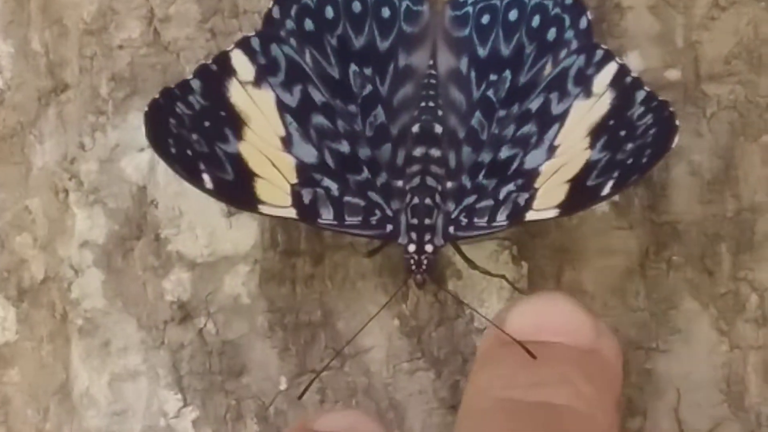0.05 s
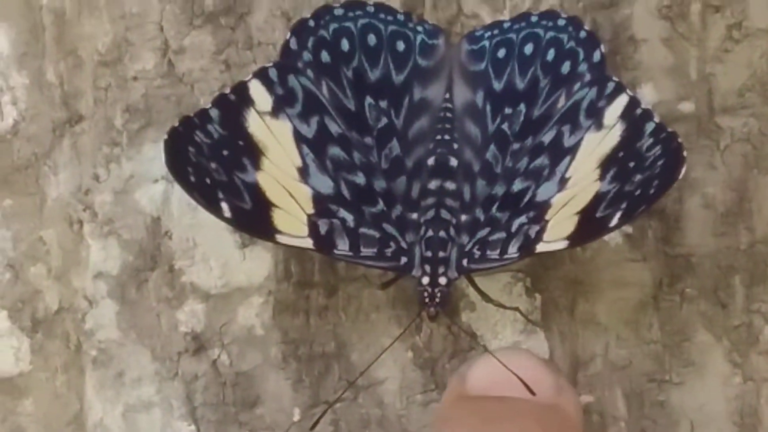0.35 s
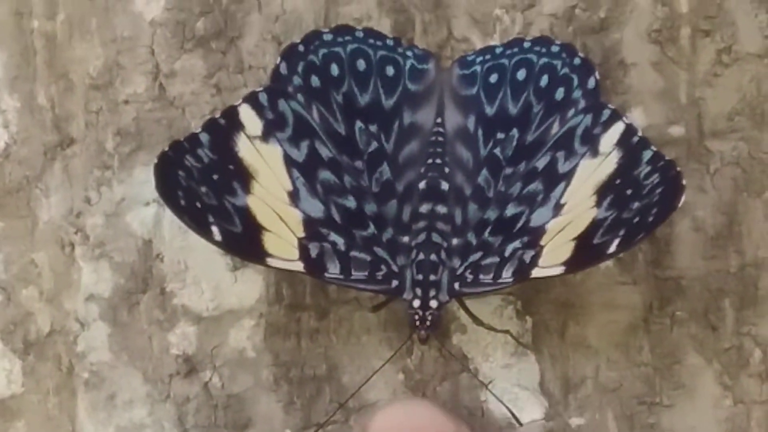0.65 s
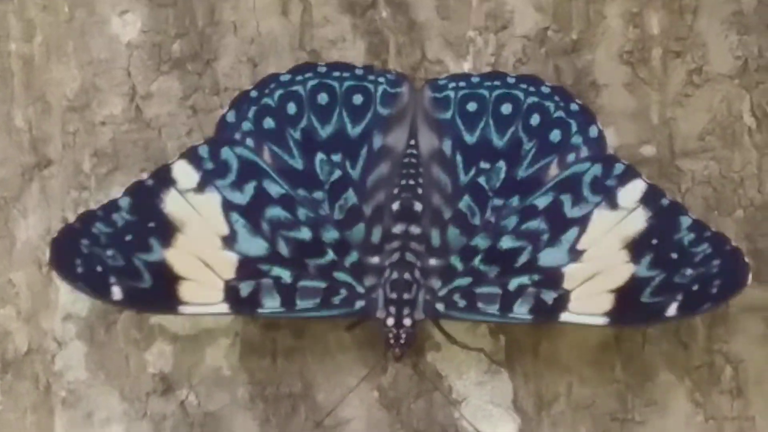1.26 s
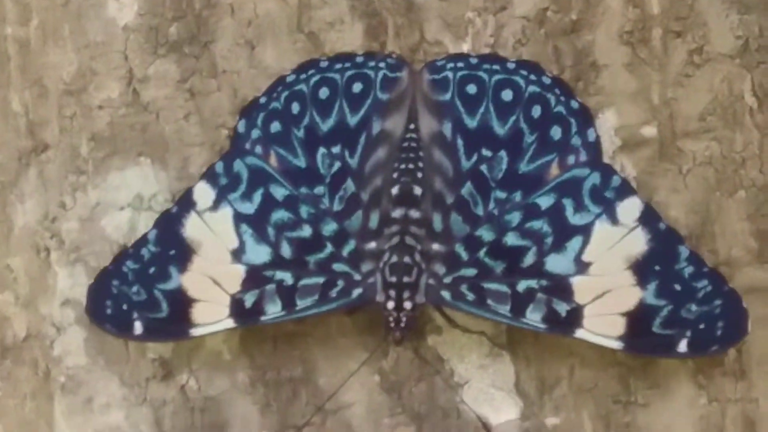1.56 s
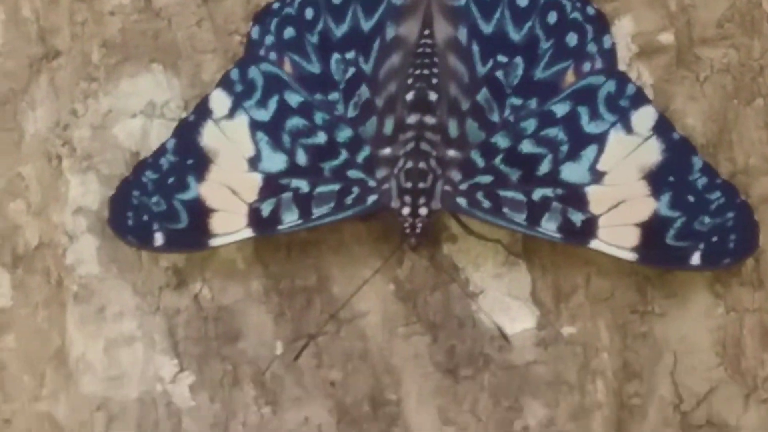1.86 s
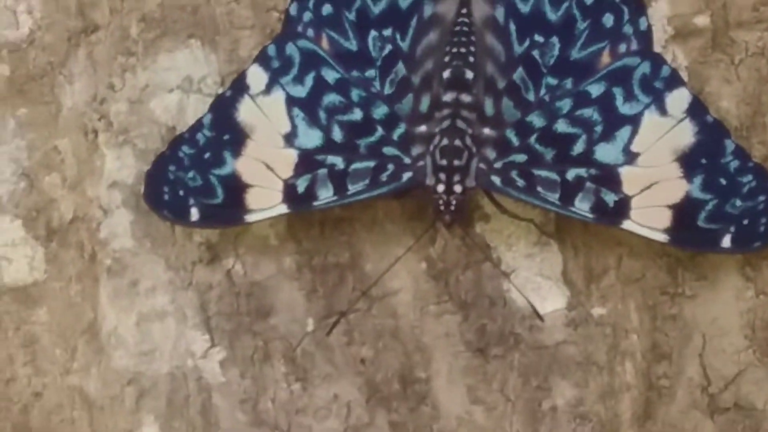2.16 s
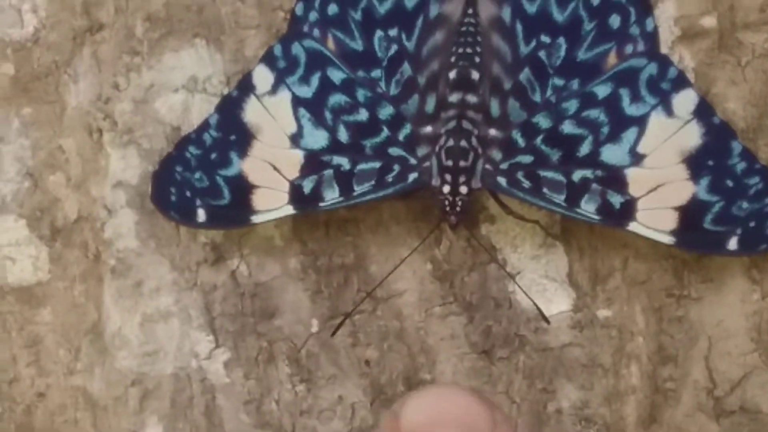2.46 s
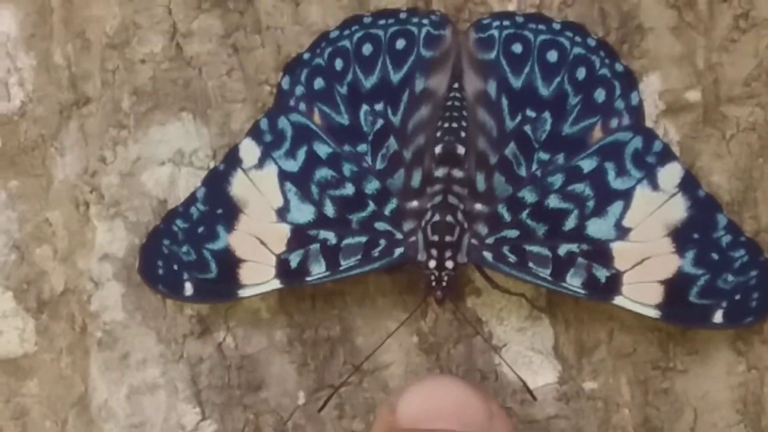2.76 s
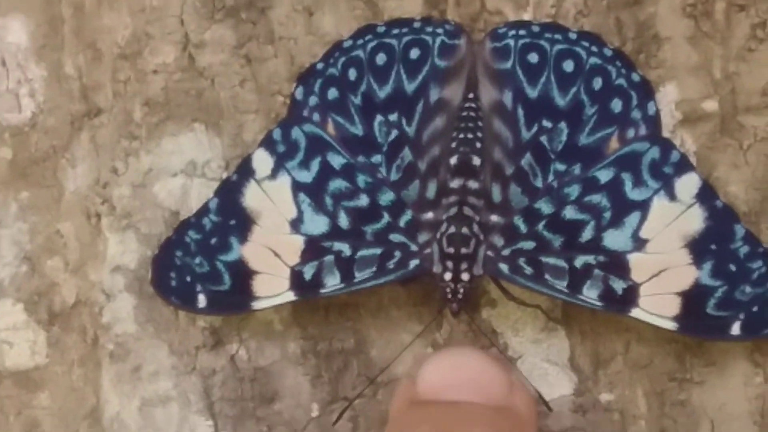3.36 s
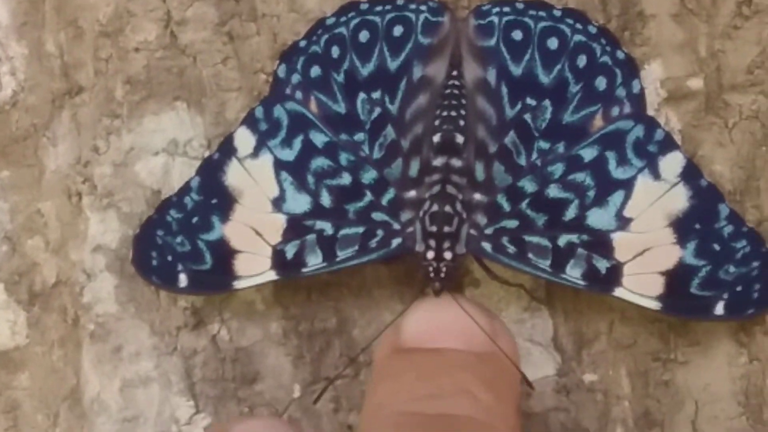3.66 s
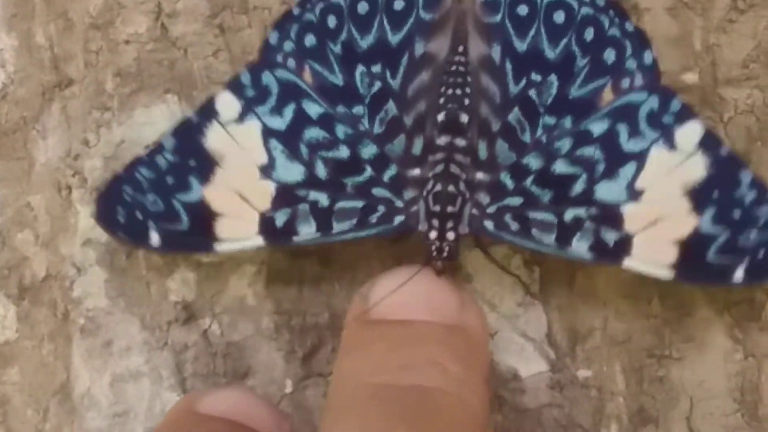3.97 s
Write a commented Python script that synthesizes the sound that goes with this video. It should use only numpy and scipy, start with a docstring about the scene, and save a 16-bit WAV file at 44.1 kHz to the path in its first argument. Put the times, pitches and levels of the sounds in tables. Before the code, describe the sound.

Something dry rubs close to the microphone outdoors, crackling with sharp little snaps, dense at first, then in sparser bursts. A distant engine sinks to idle and speeds up again, and one thin, high chirp sounds midway.

```python
"""Outdoors, something dry rubs close by: thousands of tiny slips make a crackle, bigger catches
let go with sharp snaps, and now and then a scrape rings briefly. Far off, an engine puffs through
a booming exhaust: it sinks to idle, picks up speed and eases off once.
One thin, high chirp sounds over the faint hiss of the air."""
import sys
import numpy as np
from scipy import signal
from scipy.fft import rfft, irfft
from scipy.io import wavfile
from scipy.ndimage import map_coordinates

SR = 44100
rng = np.random.default_rng(int(sys.argv[2]) if len(sys.argv) > 2 else 0)


def to_wav(s):
    """Save 16-bit WAV."""
    ch = np.atleast_2d(s).T  # columns
    pcm = np.round(np.clip(ch, -1, 1) * 32767)  # PCM
    wavfile.write(sys.argv[1], SR, pcm.astype(np.int16))


N = 176400
T, HZ = np.arange(N) / SR, np.fft.rfftfreq(N, 1 / SR)


def amp(db):
    """Turns decibels into a number to multiply by."""
    return 10 ** (np.asarray(db) / 20)


def evened(x):
    """Scales a sound to an average power of 1."""
    return x / np.sqrt(np.mean(x ** 2) + 1e-20)


def add(mix, start_s, sound):
    """Mixes a sound in at the given time."""
    part = mix[max(round(start_s * SR), 0):][:len(sound)]
    part += sound[:len(part)]


def colour(x, tone):
    """Filters a sound by a tone table; any ringing comes after a hit, never before."""
    f, db = np.transpose(tone)
    log_gain = np.log(amp(np.interp(np.log(HZ + 1), np.log(f), db)))
    log_response = np.conj(signal.hilbert(np.r_[log_gain, log_gain[-2:0:-1]]))
    return irfft(rfft(x) * np.exp(log_response[:len(HZ)]), N)


def bands(x, low_hz=1514, high_hz=6060):
    """Splits a sound into low body, middle rasp and high treble."""
    low = 1 / (1 + (HZ / low_hz) ** 14)
    high = 1 - 1 / (1 + (HZ / high_hz) ** 8)
    return [irfft(rfft(x) * share, N) for share in (low, 1 - low - high, high)]


def patchy(x):
    """As the contact shifts, random patches of pitch get briefly louder or softer."""
    hz, t, spectrum = signal.stft(x, SR, nperseg=1024, noverlap=768)
    for db, width_hz, length_s in ((3.5, 129.7, .03), (1.04, 967, .02)):  # narrow, then broad
        field = rng.uniform(-1, 1, (400, 400)) * np.sqrt(3)
        grid = np.meshgrid(hz / width_hz, t / length_s, indexing="ij")
        spectrum = spectrum * amp(db * map_coordinates(field, grid, order=1, mode="wrap"))
    return signal.istft(spectrum, SR, nperseg=1024, noverlap=768)[1][:N]


# Tone of the rubbing: f/Hz, level/dB
RUB_TONE = [(60,-36),(180,-13),(320,-15.5),(450,-11.5),(700,-13),(1050,-10),(1350,-12),(1800,-7),(2400,-8),(3100,-3),(3900,0),(4600,-0.5),(6400,-7.5),(8100,-8),(9000,-14.5),(11200,-10.5),(13800,-12.5),(15800,-14)]
# How loud the rubbing is, before trim_db is added: t/s, body/dB, rasp/dB, treble/dB
RUB_LEVELS = [(0.0, -66, -47.5, -58), (0.06, -57, -51.5, -58), (0.12, -66, -56.5, -59.5),
              (0.2, -73, -55.5, -59.5), (0.26, -69.5, -49.0, -51.5), (0.32, -67.5, -50.5, -57),
              (0.38, -53.5, -43.5, -54.5), (0.47, -62, -48.0, -49), (0.55, -61.5, -46.5, -55),
              (0.62, -67, -55, -58), (0.69, -69, -50, -57.0), (0.73, -64.5, -44.5, -50.0),
              (0.82, -67.5, -50.5, -53), (0.97, -71.5, -51.0, -55.5), (1.04, -68.5, -54, -56.5),
              (1.1, -68.5, -49.5, -53), (1.17, -68, -49.5, -53), (1.23, -57, -47.5, -50.5),
              (1.309, -63, -45.5, -52), (1.38, -58.5, -39.5, -46.5), (1.45, -61.5, -46.5, -52),
              (1.52, -64.0, -45.5, -50.0), (1.62, -56, -47, -52), (1.72, -67.5, -55.0, -57),
              (1.8, -76, -57.5, -63), (1.9, -83, -63.5, -67.5), (1.968, -66, -49.5, -57),
              (2.06, -75, -64, -67.5), (2.16, -82.0, -64.0, -69), (2.3, -79.0, -59.0, -59.5),
              (2.39, -75, -61.5, -63), (2.51, -79, -64.0, -65.5), (2.578, -68, -49.5, -52.5),
              (2.7, -74, -55, -58), (2.77, -77.0, -56.5, -62.5), (2.85, -85, -59.5, -58.5),
              (2.93, -84, -67.0, -74), (3.02, -90, -67, -66.0), (3.063, -64.5, -41.5, -46.5),
              (3.13, -67.0, -50.5, -52), (3.19, -93, -64.5, -68.5), (3.32, -103, -63.5, -61),
              (3.44, -63.5, -48.0, -48.5), (3.5, -81.5, -62.5, -59), (3.59, -71, -49.5, -51.5),
              (3.7, -87, -64.5, -59), (3.83, -80.5, -61, -58.5), (3.97, -67.5, -48.5, -56.0),
              (4.0, -94, -55.5, -59)]

def rubbing(slips_per_s=5500, spread_db=3, crack_s=.0015, tail_s=.16, tail_db=1, smooth=.48):
    """Each tiny slip makes a brief crackle with a tail; pressure sets how loud the three bands are."""
    sizes = amp(spread_db * np.minimum(rng.exponential(1, N), 6))
    slips = sizes * (rng.random(N) < slips_per_s / SR)
    t = T[:SR // 5]
    crack = evened(np.exp(-t / crack_s))
    tail = amp(tail_db) * evened(np.exp(-np.log(1000) * t / tail_s))  # 60 dB down after tail_s
    power = abs(signal.fftconvolve(slips ** 2, crack ** 2 + tail ** 2)[:N])
    loudness = np.hypot(evened(np.sqrt(power)), smooth)  # smooth hiss fills the gaps
    crackle = colour(loudness * patchy(rng.standard_normal(N)), RUB_TONE)
    times, *levels = np.transpose(RUB_LEVELS)
    trim_db = (-1, -1.5, 2.5)
    parts = zip(bands(crackle), levels, trim_db)
    return sum(evened(band) * amp(np.interp(T, times, level) + db) for band, level, db in parts)


def echo(x, level_db, fade_s):
    """Adds a blurred echo from trunks and ground, 60 dB down after fade_s."""
    t = T[:SR // 2]
    tail = rng.standard_normal(len(t)) * np.exp(-np.log(1000) * t / fade_s)
    return x + amp(level_db) * signal.fftconvolve(x, tail / np.linalg.norm(tail))[:N]


# How often the engine fires: t/s, f/Hz
FIRING_RATE = [(0.0, 32.7), (0.4, 32.2), (0.8, 30.1), (1.3, 27.3), (1.75, 23.6), (2.15, 23.5), (2.45, 26.9),
               (2.7, 33.0), (2.95, 40.0), (3.3, 51.3), (3.42, 52.5), (3.55, 49.2), (3.75, 50.7),
               (4.0, 52.4)]
# How loud the engine is: t/s, level/dB
ENGINE_LEVELS = [(0, -54.5), (.6, -55.5), (1.1, -55.5), (1.55, -56.5), (1.75, -60), (2.15, -61),
                 (2.4, -61.5), (2.6, -56.5), (3, -56.5), (3.2, -53.5), (3.37, -51), (3.43, -62),
                 (3.56, -64), (3.63, -53), (3.8, -49.5), (4, -54)]
# Each cylinder's puff, in firing order: level/dB, delay/s
CYLINDER_PUFFS = [(-0.5, .0002), (0.5, .0005), (-2.5, -.0005), (-2.5, -.0003)]
# Tone of the exhaust: f/Hz, level/dB
EXHAUST_TONE = [(20, -53), (36, -51), (50, -29.5), (64, -10), (78, -0.5), (90, 2), (104, -1.5), (115, -6),
                (130, -13), (160, -9), (178, -5), (195, -1.5), (220, -6.5), (250, -20.5), (290, -25.5),
                (350, -26.5), (600, -43.5), (1200, -63)]

def engine(spread_db=3.14, roughness=.3, throb_db=3.5, throb_peak=.47):
    """Four unequal cylinders puff through a booming exhaust; only the bass carries this far."""
    firings = np.cumsum(np.interp(T, *np.transpose(FIRING_RATE))) / SR + .1503
    at = np.flatnonzero(np.diff(np.floor(firings)))  # a puff at each whole number
    db, delay_s = np.resize(np.roll(CYLINDER_PUFFS, 1, axis=0), (len(at), 2)).T
    strength = amp(db + spread_db * rng.standard_normal(len(at)))
    pulses = np.zeros(N)
    pulses[np.clip(at + np.round(delay_s * SR).astype(int), 0, N - 1)] = strength
    rush = rng.standard_normal(N) * np.interp(T, T[at], strength)
    boom = evened(colour(pulses, EXHAUST_TONE)) + roughness * evened(colour(rush, EXHAUST_TONE))
    cycles = firings / len(CYLINDER_PUFFS)
    throb = amp(throb_db * np.cos(2 * np.pi * (cycles - throb_peak)))  # one swell every four puffs
    boom = evened(throb * echo(boom, level_db=-7, fade_s=.13))
    return boom * amp(np.interp(T, *np.transpose(ENGINE_LEVELS)))


# Tone of the air: f/Hz, level/dB
AIR_TONE = [(25, -18), (38, -17), (62, 10), (100, 3), (200, 13.5), (400, -13.5), (1000, -19), (1400, -19.5),
            (1900, -26), (4000, -4), (7000, -10.5), (15500, -27)]

def air(level_db=-64):
    """A faint, steady outdoor hiss with a soft rumble under it."""
    return amp(level_db) * evened(colour(rng.standard_normal(N), AIR_TONE))


# Tone of the snaps: f/Hz, level/dB
SNAP_TONE = [(50, -69), (150, -35), (400, -16.5), (1000, -11.5), (2000, -4.5), (3000, 2.5), (4200, 3.5),
             (6000, 0), (9000, -1.5), (15500, -3)]
# One row for each snap: t/s, level/dB, extra body/dB, extra treble/dB
SNAP_HITS = [(0.073, -42.5, -13, -3.5), (0.0858, -43.5, -15, -6), (0.342, -44.5, 7, -5),
             (0.372, -42, -14, -16), (.419, -46, 2, -2), (0.504, -45.5, 12, -15), (0.717, -40, -14, -10),
             (.829, -41.5, -14, -9), (1.097, -45, 4, 5.5), (1.1, -49, -3, -6), (1.131, -43.5, -17, -5),
             (1.248, -37, -9, -20), (1.407, -48, 0, 1), (1.5, -35, 10.5, -10), (1.583, -38.5, -18, -7),
             (1.702, -43.5, -16, -1), (1.9132, -46, 3, -7), (1.957, -49, 8, 4.5), (2.2585, -53, -11, 13.5),
             (2.351, -65, -6, 0), (2.577, -48, -10, 1), (2.712, -40, 1.5, 3.5), (2.827, -50.5, -13, -1),
             (2.858, -58, -4, 11.5), (3.037, -60, -9, 11), (3.051, -44, -2, 0), (3.067, -41.5, 9.5, -3),
             (3.135, -43.5, 5, -8), (3.224, -51, -19, -1), (3.417, -70, 2, -2), (3.441, -42, -17, -1),
             (3.897, -48, 0, -2), (3.978, -47, -22, -3)]

def snaps(crack_s=.0045, tail_s=.025, tail_db=-6):
    """Bigger catches let go, each with a quick crack and a weak tail."""
    t, loudness = T[:SR // 5], np.zeros((3, N))
    fade = np.exp(-t / crack_s) + amp(tail_db) * np.exp(-t / tail_s)
    for start_s, db, body_db, treble_db in SNAP_HITS:
        for track, extra_db in zip(loudness, (body_db, 0, treble_db)):
            add(track, start_s, amp(db + extra_db) * fade)
    noise = evened(colour(rng.standard_normal(N), SNAP_TONE))
    return (loudness * bands(noise)).sum(0)


def fuzzy_tone(hz, width_hz):
    """A narrow band of noise that follows the pitch curve hz."""
    noise = rng.standard_normal(len(hz)) + 1j * rng.standard_normal(len(hz))
    fuzz = signal.lfilter(*signal.butter(2, width_hz / 2, fs=SR), noise)
    return evened((fuzz * np.exp(2j * np.pi * np.cumsum(hz) / SR)).real)


# Each scrape at its loudest moment: t/s, length/s, f/Hz, width/Hz, level/dB
RINGING_SCRAPES = [(0.737, .035, 2804, 600, -47.5), (0.735, .03, 1700, 300, -54),
                   (1.133, 0.0083, 2800, 700, -47.5), (1.252, 0.0098, 3886, 1100, -44),
                   (1.505, .014, 990, 600, -55), (1.621, 0.02, 689.5, 325, -52),
                   (1.788, 0.11, 3510, 500, -61), (1.934, 0.018, 5880, 500, -52.5),
                   (2.587, 0.051, 4410, 900, -53), (3.079, 0.062, 1860, 590, -49.5),
                   (3.238, 0.11, 3250, 400, -67), (3.95, 0.081, 2910, 700, -57)]

def scrapes():
    """Now and then the rubbing rings at one pitch, which swells and fades."""
    out, t = np.zeros(N), T[:SR // 2]
    for peak_s, length_s, hz, width_hz, db in RINGING_SCRAPES:
        swell = np.exp(-(2 * (t - t.mean()) / length_s) ** 2)
        add(out, peak_s - t.mean(), amp(db) * swell * fuzzy_tone(np.full(len(t), hz), width_hz))
    return out


# The pitches the chirp starts on, all together: f/Hz, width/Hz, level/dB
CHIRP_PITCHES = [(8660, 1300, -49.5), (6100, 1200, -54.5), (10500, 2000, -56)]

def chirp(start_s=2.404, rise_s=.018, fade_s=.04, sag_hz_per_s=4500):
    """A thin, fuzzy whistle whose pitch sags a little as it fades."""
    out, t = np.zeros(N), T[:SR // 4]
    swell = np.minimum(t / rise_s, 1) * np.exp(-np.maximum(t - rise_s, 0) / fade_s)
    for hz, width_hz, db in CHIRP_PITCHES:
        add(out, start_s, amp(db) * swell * fuzzy_tone(hz - sag_hz_per_s * t, width_hz))
    return out


def scene():
    """Adds all the sounds into one channel."""
    close_by = rubbing() + scrapes() + snaps()
    return (close_by + engine() + chirp() + air())[None]


def record(dry, top_hz=15900):
    """Cuts away the very highest treble."""
    treble_cut = signal.firwin(511, top_hz, window=("kaiser", 9), fs=SR)
    return signal.oaconvolve(dry, treble_cut[None], "same")


dry = scene()
out = record(dry)
to_wav(out)
```